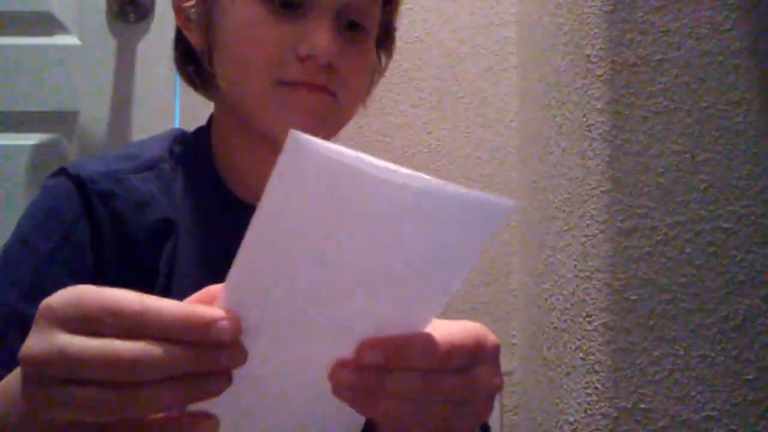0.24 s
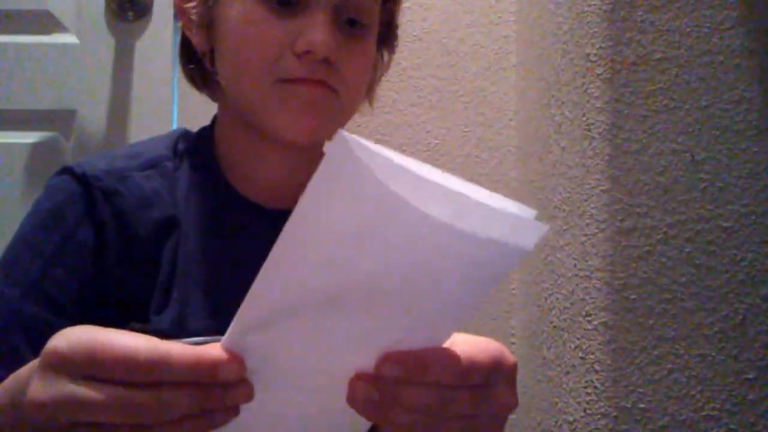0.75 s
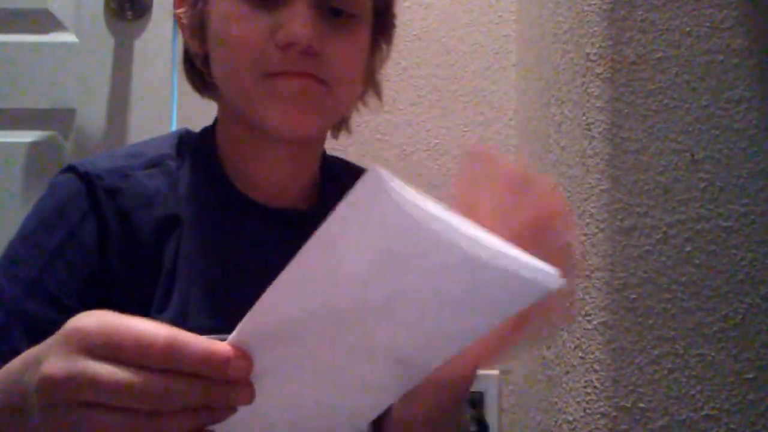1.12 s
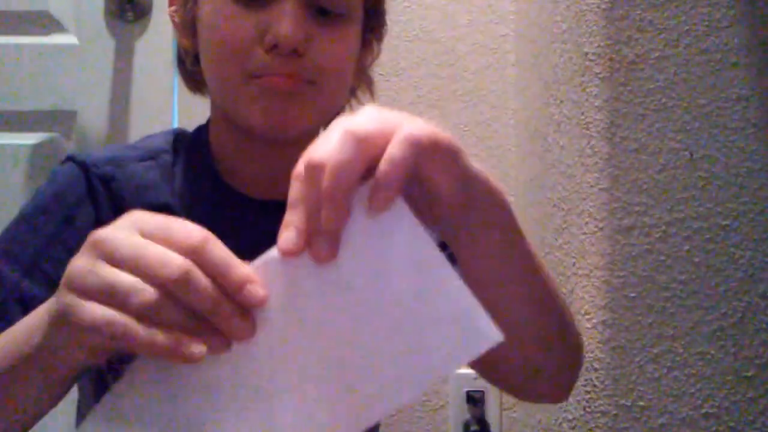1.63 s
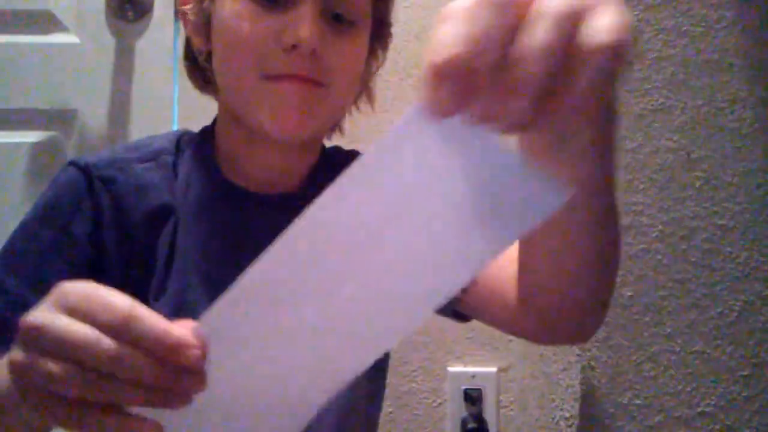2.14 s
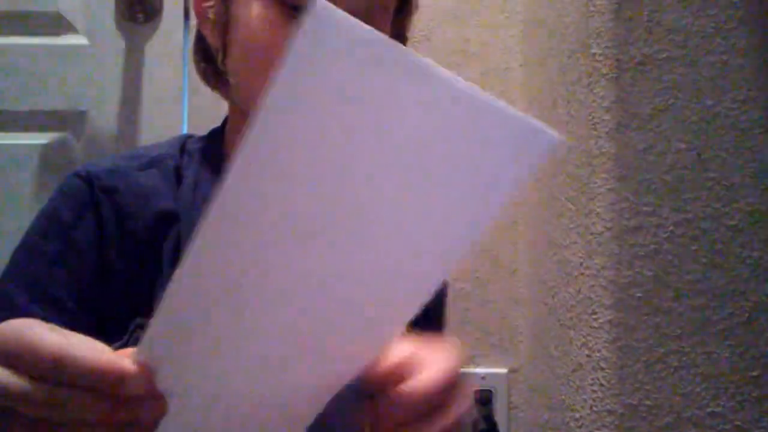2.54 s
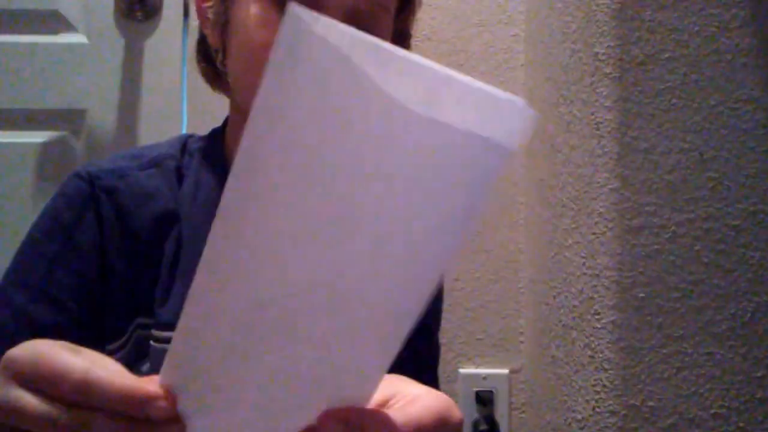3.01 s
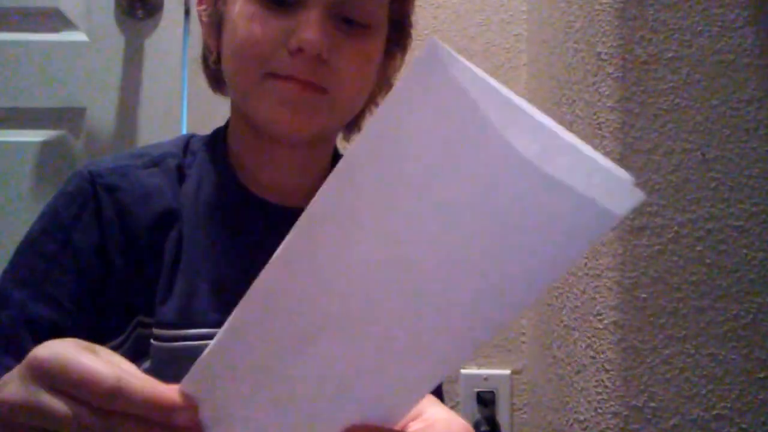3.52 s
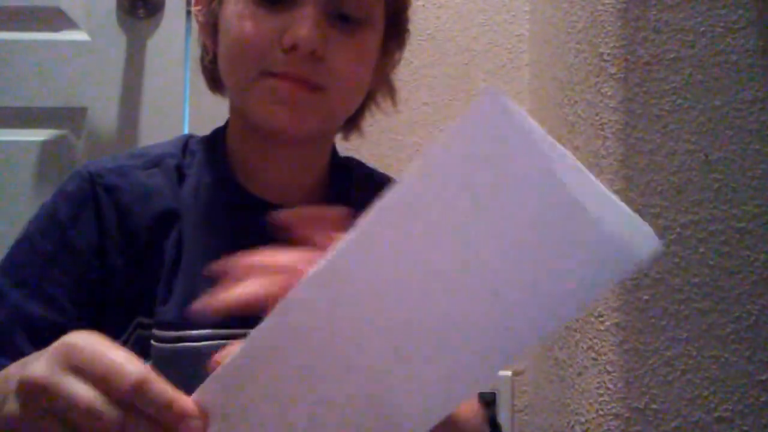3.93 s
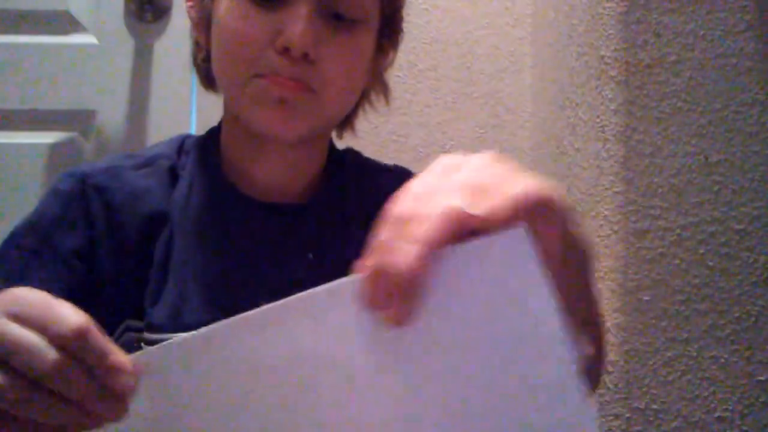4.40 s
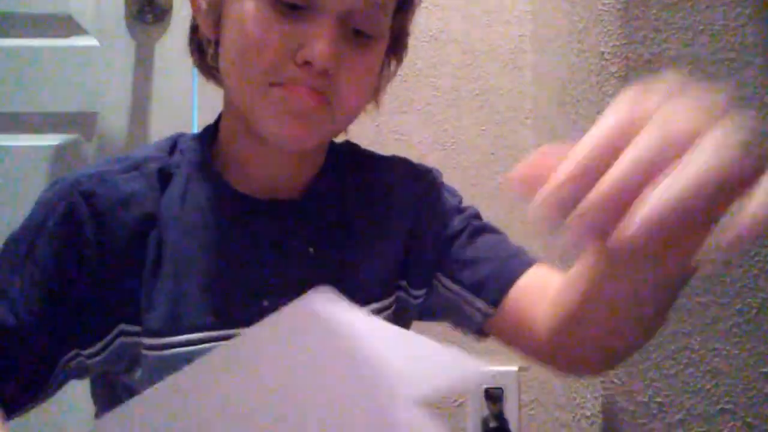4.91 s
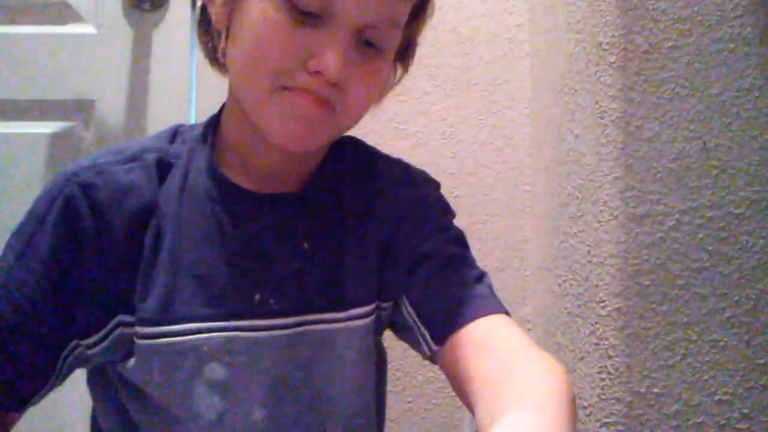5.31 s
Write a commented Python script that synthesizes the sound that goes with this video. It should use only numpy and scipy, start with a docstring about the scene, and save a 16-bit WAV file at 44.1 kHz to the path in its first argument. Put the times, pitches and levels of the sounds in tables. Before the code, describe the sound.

A folded sheet of paper is handled close to a microphone in a small, dead room. From 0.2 to 1.2 s there are loose, dull buckles and pops, one short crisp snap near 0.5 s, and light rustling. A brief rustle comes at 1.5 s, then a hard snap at about 1.76 s and two gritty, hissing finger strokes along the crease until 2.35 s. A quieter gap follows, with small rubs near 2.9 s. Between 3.2 and 3.9 s the sheet flexes in light crackles, ending in a very sharp, bright crack at 3.9 s. From 4.15 to 4.9 s a long, firm creasing rub carries the loudest cluster of cracks, around 4.45-4.6 s. After a near lull, crisp crumply rustling lays the sheet down from 5.2 s to the end. Soft low air thuds accompany the swings, over coloured room noise, faint mains hum and a thin, wavering high whine.

```python
"""A folded sheet of paper is handled close to a microphone in a small, dead room; both channels are alike.
It buckles in snaps, trains of micro-cracks, and some set a panel ringing as a damped note.
Fingers slide along the crease with a gritty hiss of noise grains, while the sheet crinkles and flexes.
Swings of the sheet push low, lumpy air and land as soft thuds made of two low sines.
Below lie coloured room noise, faint mains hum and a thin whine whose level wavers."""
import sys
import numpy as np
from scipy import signal
from scipy.fft import rfft, irfft
from scipy.io import wavfile

SR = 44100
rng = np.random.default_rng(int(sys.argv[2]) if len(sys.argv) > 2 else 0)


def field_ratio(decibels):
    """Amplitude ratio for a level in dB (20 dB per decade); scalars and array-likes work."""
    return 10 ** (np.asarray(decibels, dtype=float) / 20)


def wrap_up_sound(samples):
    """Save the sound to the file named by the first command line argument, as 16-bit audio."""
    columns = np.atleast_2d(samples).T
    # keep every value between -1 and 1, then stretch to whole-number steps
    tamed = np.clip(columns, -1, 1)
    steps = np.round(tamed * 32767).astype(np.int16)
    wavfile.write(sys.argv[1], SR, steps)


N = 244755


def rms_one(x):
    """Scales a signal to rms 1."""
    return x / np.sqrt(np.mean(x ** 2) + 1e-20)


def in_time(rows):
    """Draws each level column as straight lines between its time points."""
    s, *columns = np.transpose(rows)
    return [np.interp(np.arange(N) / SR, s, c) for c in columns]


def band(x, low_hz, high_hz, order=2):
    """Keeps the range between two frequencies."""
    return signal.sosfilt(signal.butter(order, [low_hz, high_hz], "band", fs=SR, output="sos"), x)


def coloured(x, spectrum):
    """Shapes noise to a spectrum drawn over log frequency, rms 1."""
    hz, level_db = np.transpose(spectrum)
    grid = np.maximum(np.fft.rfftfreq(N, 1 / SR), 1)
    gain = field_ratio(np.interp(np.log(grid), np.log(hz), level_db))
    return rms_one(irfft(rfft(x) * gain, N))


def drift(rate_hz):
    """Slow random wander, rms 1: noise smoothed by two equal poles."""
    r = np.exp(-2 * np.pi * rate_hz / SR)
    return rms_one(signal.lfilter([1], [1, -2 * r, r * r], rng.standard_normal(N + SR))[SR:])


def grains(per_s, spread_db, clump_db, clump_rate):
    """Tiny slips of uneven size and random sign, clumped by a slow wander of their level; rms 1."""
    born = rng.random(N) < per_s / SR
    sizes = field_ratio(spread_db * np.minimum(rng.exponential(1, N), 5)) * rng.choice([-1, 1], N)
    return rms_one(born * sizes * field_ratio(clump_db * drift(clump_rate)))


# colour of the room noise: [f/Hz, relative level/dB]
ROOM_NOISE_SPECTRUM = [(18, -42), (45, 0.5), (204, -12), (273, -12.5), (415, -5.5), (512, -12), (1220, -18),
                       (6900, -23.5), (16000, -23.5)]
# wavering whine: [t/s, rms level/dB]
WHINE_LEVEL = [(0.0, -70), (0.5, -62), (0.9, -76), (1.2, -78), (1.6, -71), (2.4, -67.5), (2.7, -74),
               (2.9, -62), (3.4, -69), (3.8, -66), (4.9, -68.5), (5.55, -75)]


def background():
    """Room noise with a slight flicker, plus two steady-pitched sines: faint mains hum and the whine."""
    noise = coloured(rng.standard_normal(N), ROOM_NOISE_SPECTRUM)
    noise = noise * field_ratio(-61.5 + 1.5 * drift(5))
    turn_per_hz = 2 * np.pi * np.arange(N) / SR
    hum = field_ratio(-73) * np.sin(60 * turn_per_hz)
    whine_db, = in_time(WHINE_LEVEL)
    whine = np.sqrt(2) * field_ratio(whine_db) * np.sin(8000.5 * turn_per_hz)  # root 2 turns rms into peak
    return noise + hum + whine


# swings of the sheet, also heard as thuds: [t/s of the peak, level/dB, t/s to fall 20 dB (at least 0.01)]
SHEET_SWINGS = [(0.219, -44, 0.3), (0.49, -52.5, 0.6), (0.758, -47.5, 0.18), (1.198, -50, 0.15),
                (1.549, -49.5, 0.4), (1.758, -46, 0.5), (1.969, -55, 1), (2.171, -47, 0.44),
                (2.802, -54, 0.3), (3.199, -52, 0.2), (3.532, -49, 1.5), (4.173, -47.5, 0.4),
                (4.501, -44, 0.46), (4.63, -54, -0.13), (4.889, -53, 0.7), (5.271, -46, 0.3),
                (5.501, -49.5, -3)]


def air_push():
    """Swings of the sheet push lumpy low air at the microphone, strongest in a narrow hollow band."""
    rise_db_per_s, still_air_db = 343.5, -76
    t, push_db = np.arange(N) / SR, np.full(N, float(still_air_db))
    for s, peak_db, fall_s in SHEET_SWINGS:
        slope = np.where(t < s, rise_db_per_s, 20 / max(fall_s, .01))
        push_db = np.maximum(push_db, peak_db - slope * np.abs(t - s))
    air = rng.standard_normal(N)
    low_air = band(air, 54, 250) + field_ratio(3.5) * band(air, 48, 78)
    lumps = field_ratio(3.8 * drift(17))
    return field_ratio(push_db) * rms_one(low_air * lumps)


# buckling snaps, also the start of each settling:
# [t/s, body level/dB, middle level/dB, edge level/dB, dying time constant/ms]
BUCKLES = [(0.171, -30.5, -62, -73, 5.7), (0.206, -16, -16, -31, 5.9), (0.287, -28.5, -46, -50, 5.7),
           (0.378, -45, -34.5, -45, 1.2), (0.395, -41.5, -38, -33, 4), (0.437, -38, -54, -33.5, 1.5),
           (0.498, -16.5, -13.5, -34.5, 1.05), (0.589, -27.5, -34, -51, 7), (0.634, -39, -29.5, -26.5, 2.2),
           (0.747, -22, -28.5, -39.5, 8.1), (0.806, -24.5, -33.5, -50.5, 7.9),
           (0.855, -29.5, -47, -63, 3.3), (0.996, -38, -67, -78, 1.7), (1.126, -35, -55, -36, 0.7),
           (1.141, -25, -37, -47, 5.1), (1.19, -23.5, -22, -23.5, 1.1), (1.21, -18, -22.5, -43, 1.3),
           (1.455, -57, -33.5, -28.5, 5.4), (1.619, -22, -42, -43, 1.3), (1.624, -27, -16.5, -26.5, 2.5),
           (1.645, -35, -21.5, -42, 2), (1.762, -10, -1.5, -11.5, 2.7), (1.852, -19, -21.5, -35, 4.4),
           (1.972, -27.5, -52, -42, 2.4), (2.042, -35, -56, -33, 1.3), (2.081, -27, -27.5, -28, 1.8),
           (2.16, -13, -15, -21, 3.3), (2.171, -16.5, -43, -22, 0.91), (2.24, -22.5, -33.5, -42, 6.6),
           (2.267, -48, -29, -51, 2.1), (2.403, -26, -25, -27, 5.4), (2.75, -38, -51, -48, 3.7),
           (2.785, -25.5, -29.5, -52.5, 3.7), (2.925, -30.5, -35, -53, 2.5), (3.185, -21, -18.5, -26, 5.7),
           (3.296, -18, -20.5, -32.5, 1.25), (3.355, -57, -40, -42, 2.3), (3.501, -32.5, -25.5, -23.5, 5.4),
           (3.584, -23, -25.5, -39, 5.4), (3.608, -27.5, -39, -49.5, 1.3), (3.638, -31, -40, -55, 2.5),
           (3.647, -28, -37, -62, 3.1), (3.665, -39, -36, -29.5, 1.4), (3.672, -26, -30, -46, 4.1),
           (3.741, -22, -13, -27.5, 0.87), (3.85, -28.5, -38, -45, 1.3), (3.887, -23.5, -19, -34.5, 0.67),
           (3.899, -25.5, -28, -42, 1.5), (3.9115, -11, -9, -5.5, 2), (4.169, -21, -33, -38, 5),
           (4.253, -19.5, -15.5, -26, 2.6), (4.444, -17.5, -2.5, -9.5, 1.43), (4.475, -24, -26, -28, 1.3),
           (4.492, -21.5, -10.5, -18, 15), (4.515, -8.5, -1.5, -6.5, 5.8), (4.551, -17, -3.5, -8, 4.6),
           (4.6199, -40, -1.5, -8.5, 1.3), (4.849, -29, -24, -26, 2.8), (5.008, -32, -40, -50.5, 3),
           (5.076, -36, -41, -61.5, 5.4), (5.222, -25.5, -14, -19.5, 7.1), (5.247, -27, -10, -13, 8.4),
           (5.323, -21.5, -16, -30.5, 9.3), (5.363, -24.5, -15.5, -28, 3.9), (5.402, -34, -25.5, -42, 3.3),
           (5.447, -21, -6, -4, 1.9), (5.461, -24.5, -13, -27, 11.4), (5.486, -22, -12.5, -11.5, 5.3)]


def snaps():
    """Each buckle is a quick train of micro-cracks that swells and dies, mixed from three bands."""
    panel_lift, panel_sharpness = 0.8, 4  # gain and Q of the bent sheet's resonances
    size = int(.07 * SR)
    t, out = np.arange(size) / SR, np.zeros(N + size)
    blunting = signal.butter(2, 7960, fs=SR, output="sos")  # softens body and middle
    for s, body_db, middle_db, edge_db, die_ms in BUCKLES:
        cracks = rng.standard_normal(size) * field_ratio(5.7 * rng.exponential(1, size))
        swell, die = (0.73 + 0.19 * die_ms) / 1000, die_ms / 1000  # s; slow snaps swell longer
        burst = cracks * np.where(t < swell, (t / swell) ** 2, np.exp(-(t - swell) / die))
        # every buckle favours three chance pitches
        for pitch_hz in 500 * 2 ** rng.uniform(0, 4, size=3):
            peak = signal.iirpeak(pitch_hz, panel_sharpness, fs=SR)
            burst = burst + panel_lift * signal.lfilter(*peak, burst)
        crispness_db = edge_db - middle_db
        reach_hz = np.interp(crispness_db, [-24, -6], [2800, 5200])  # a dull buckle's middle stops lower
        top_hz = np.interp(crispness_db, [-4, 6], [8500, 10500])  # a crisp one's edge reaches higher
        blunt = signal.sosfilt(blunting, burst)
        body = band(blunt, 340, 2420, order=3)
        middle = band(blunt, 1498, reach_hz, order=3)
        edge = band(band(burst, 5670, top_hz), 5400, top_hz + 500)
        at = round(s * SR)
        for peak_db, part in ((body_db, body), (middle_db, middle), (edge_db, edge)):
            crest = np.sqrt(2.5 * np.sum(part ** 4) / np.sum(part ** 2))  # typical height of the loud part
            out[at:at + size] += field_ratio(peak_db) * part / crest
    return out[:N]


# short shifts of the grip: [start t/s, length t/s, rub level/dB, crinkle level/dB, flex level/dB]
GRIP_SHIFTS = [(0.179, 0.13, -61.5, -53.5, -55), (0.352, 0.037, -51, -54, -70),
               (0.426, 0.0075, -58, -52, -69), (0.54, 0.068, -40, -44, -62), (0.759, 0.11, -68, -63, -51),
               (1.09, 0.03, -53, -63, -82), (1.13, 0.093, -48, -61.5, -53),
               (1.455, 0.064, -52, -60.5, -58.5), (1.532, 0.04, -35, -37.5, -39.5),
               (1.617, 0.06, -50, -53, -41.5), (1.71, 0.04, -50, -53, -47), (2.385, 0.044, -53.5, -57, -64),
               (2.552, 0.17, -85, -80, -64.5), (2.781, 0.025, -50.5, -54, -41.5),
               (2.855, 0.05, -50, -55, -51.5), (2.873, 0.074, -39.5, -48, -56),
               (3.002, 0.12, -53.5, -64.5, -82), (3.157, 0.026, -36.5, -42, -52),
               (3.449, 0.019, -62.5, -68, -49.5), (3.487, 0.026, -49, -64, -53.5),
               (3.537, 0.091, -50.5, -64, -49), (3.646, 0.024, -55, -51, -49.5),
               (3.846, 0.072, -46.5, -55, -57), (4.897, 0.081, -64, -75, -47.5),
               (5.003, 0.042, -67, -72, -55), (5.104, 0.029, -90, -80.5, -54)]
# long strokes, three along the crease and one laying the sheet down, each a list of points:
# [t/s, rub level/dB, crinkle level/dB, flex level/dB]
LONG_STROKES = [
    [(1.79, -57, -60, -41), (1.813, -47, -53, -49.5), (1.905, -34.5, -44, -59.5), (1.982, -42, -46, -40.5),
     (2.0, -60, -73, -63)],
    [(2.0, -61, -58, -66), (2.07, -53, -54.5, -58), (2.1, -38.5, -52.5, -71), (2.174, -35, -37.5, -41),
     (2.218, -39.5, -50, -42), (2.338, -41.5, -51.5, -64.5), (2.36, -67, -72, -58)],
    [(4.152, -73, -86, -71.5), (4.157, -38.5, -41, -34), (4.174, -52, -30.5, -43.5),
     (4.207, -44.5, -49.5, -45), (4.355, -32, -38, -56.5), (4.423, -36, -42.5, -49.5),
     (4.521, -32, -41, -47.5), (4.632, -36.5, -45, -34), (4.69, -37.5, -57, -60), (4.72, -46.5, -54, -70),
     (4.75, -39.5, -53, -88), (4.836, -39.5, -53.5, -63), (4.856, -44, -48, -41.5), (4.9, -90, -67, -46.5)],
    [(5.217, -82, -42, -48), (5.225, -27.5, -27, -38.5), (5.243, -37, -25, -35), (5.297, -38.5, -37.5, -44),
     (5.409, -41.5, -53.5, -61), (5.443, -41, -45, -54), (5.491, -42, -32, -42), (5.548, -64, -78, -75)],
]


def hand_levels():
    """Gains of rub, crinkle and flex: grips, strokes and the settling after snaps add up as power."""
    t, power = np.arange(N) / SR, np.zeros((3, N))
    for s, length, *levels_db in GRIP_SHIFTS:
        rise_loss_db = 2597 * np.maximum(s - t, 0)  # slopes in dB per s
        fall_loss_db = 496 * np.maximum(t - s - length, 0)
        power += np.outer(field_ratio(levels_db), field_ratio(-rise_loss_db - fall_loss_db)) ** 2
    for stroke in LONG_STROKES:
        active = (t >= stroke[0][0]) & (t < stroke[-1][0])
        power += field_ratio(in_time(stroke)) ** 2 * active
    s, body_db, middle_db, edge_db, _ = np.transpose(BUCKLES)
    # settling: rub follows the edge, crinkle the middle, flex the body (start re snap in dB, fade in dB per s)
    settling = ((edge_db, -16, 506), (middle_db, -21.5, 495.5), (body_db, -24, 292.5))
    for k, (snap_db, start_db, fade_db_per_s) in enumerate(settling):
        kicks = np.full(N, 1e-18)
        kicks[(s * SR).astype(int)] = field_ratio(snap_db + start_db) ** 2
        power[k] += signal.lfilter([1], [1, -field_ratio(-2 * fade_db_per_s / SR)], kicks)
    return np.sqrt(power)


def pocket(x):
    """The air pocket between the two leaves returns a short echo, so the hiss gets slowly moving bands."""
    delay_ms = np.maximum(0.452 + 0.14 * drift(0.94), .05)
    lag = delay_ms * SR / 1000
    return x + 0.32 * np.interp(np.arange(N) - lag, np.arange(N), x)


# colour of the finger rub before pocket and sheen: [f/Hz, relative level/dB]
RUB_SPECTRUM = [(2600, -33), (4200, -4.5), (5200, 0.5), (6800, -1.5), (9500, -11.5), (11500, -24.5),
                (16000, -25.5)]
# top treble added to the rub: [t/s, level/dB]
RUB_SHEEN = [(0, 16.5), (.6, -9), (1.5, -0.5), (1.9, -6), (2.2, -1), (2.9, -13), (3.9, -4.5), (4.3, -1),
             (4.85, -1.5), (5.2, 1.5), (5.55, -22)]


def hands():
    """Skin slides on the fibres with a fine even hiss; below it the sheet crinkles and flexes dully."""
    rub_gain, crinkle_gain, flex_gain = hand_levels()
    sheen_db, = in_time(RUB_SHEEN)
    rub = coloured(grains(30000, spread_db=-2.5, clump_db=2.0, clump_rate=16), RUB_SPECTRUM)
    rub = pocket(rub)
    treble = band(rub, 7400, 9300) + field_ratio(4.5) * band(rub, 7810, 13000)
    rub = rub + field_ratio(sheen_db) * treble
    crinkle = rms_one(band(grains(6000, spread_db=1.5, clump_db=0.0, clump_rate=26), 1490, 3980))
    flex = rms_one(band(grains(3000, spread_db=2.0, clump_db=2.55, clump_rate=23), 180, 1230))
    # lone ticks of fibres giving way
    ticks = grains(450, spread_db=2.2, clump_db=3.0, clump_rate=18)
    crinkle = crinkle + 1.34318 * band(ticks, 970, 4500, order=4)
    flex = flex + 1.40332 * band(ticks, 310, 1400, order=3)
    return rub_gain * rub + crinkle_gain * crinkle + flex_gain * flex


def thuds():
    """Each swing also lands as a few cycles of a hollow, low pair of notes that swells and dies."""
    lead_s, die_s = 0.028, 0.015  # start ahead of the swing's peak; time to swell, then die
    t, out = np.arange(int(.3 * SR)) / SR, np.zeros(N + SR)
    for (s, peak_db, _), spread in zip(SHEET_SWINGS, rng.uniform(-0.37, 1, len(SHEET_SWINGS))):
        pitch_hz = 65.7 * (1 + 0.12 * spread)
        turn = 2 * np.pi * pitch_hz * t
        pair = np.sin(turn) + 0.76 * np.sin(1.4 * turn)
        shape = t / die_s * np.exp(1 - t / die_s)
        at = round((s - lead_s) * SR)
        out[at:at + len(t)] += field_ratio(peak_db + 3) * pair * shape
    return out[:N]


# panels set ringing by a buckle: [t/s, f/Hz, level/dB, dying time constant/ms (at least 0.3)]
PANEL_RINGS = [(0.206, 1170, -26, 4.1), (0.267, 1130, -30, 1.4), (0.28, 475, -32, 2.9),
               (0.499, 1240, -20, 1.8), (0.809, 1200, -33, 4.8), (1.213, 1220, -34, 4.9),
               (2.171, 1305, -21.5, 1.9), (3.297, 1205, -27.5, 3.6), (3.408, 418, -45, 7.6),
               (3.448, 455, -39, 2.9), (3.671, 1170, -32, 3), (3.9113, 8400, -3, 0.27),
               (3.9121, 2270, -9.5, 0.34), (4.445, 3450, -14, 1.6), (4.553, 4300, -7.5, 1.4),
               (4.621, 670, -16, 1), (5.012, 510, -36.5, 3.8), (5.449, 3610, -10, 3.7)]


def rings():
    """Each ring is one damped note of a sheet panel."""
    swell_ms = 0.3
    t, out = np.arange(int(.07 * SR)) / SR, np.zeros(N + SR)
    for s, pitch_hz, peak_db, die_ms in PANEL_RINGS:
        swell = 1 - np.exp(-1000 * t / swell_ms)
        shape = swell * np.exp(-1000 * t / max(die_ms, .3))
        at = round(s * SR)
        out[at:at + len(t)] += field_ratio(peak_db) * shape / shape.max() * np.sin(2 * np.pi * pitch_hz * t)
    return out[:N]


# decay of the room: [f/Hz, t/s to fall 60 dB]
ROOM_DECAY = [(200, 0.16), (700, 0.044), (1800, 0.03), (5000, 0.069), (12000, 0.15)]


def room(x, first_ms, echo_db, tail_db):
    """One echo off the near wall and a dense tail whose wide, overlapping bands die at their own rates."""
    size = int(.3 * SR)
    t, tail = np.arange(size) / SR, np.zeros(size)
    for hz, t60 in ROOM_DECAY:
        tail += band(rng.standard_normal(size), hz / 5.5, hz * 1.81) * field_ratio(-60 * t / t60)
    tail *= t > first_ms / 2000  # the tail starts at half the echo's delay
    response = field_ratio(tail_db) * tail / np.sqrt(np.sum(tail ** 2))
    response[0] = 1  # direct sound
    response[int(first_ms * SR / 1000)] += field_ratio(echo_db)
    return signal.fftconvolve(x, response)[:N]


# resonances of the microphone housing: [f/Hz, width f/Hz, boost or cut level/dB]
HOUSING_BANDS = [(292, 42, -7.5), (421.6, 55, 6), (631, 5.6, 2.5), (1088, 83, 2.5), (9450, 12700, -2.5)]


def housing(x):
    """The microphone housing boosts some bands and cuts others, each through a resonator in turn."""
    for hz, width_hz, lift_db in HOUSING_BANDS:
        resonance = signal.lfilter(*signal.iirpeak(hz, hz / width_hz, fs=SR), x)
        x = x + (field_ratio(lift_db) - 1) * resonance
    return x


def scene():
    """Snaps, rings and hands sound in the room; air and thuds hit the microphone directly."""
    buckling = band(snaps() + rings(), 110, 10800, order=4)
    paper = room(buckling + hands(), first_ms=4.8, echo_db=-16.5, tail_db=-15.0)
    close = housing(paper + air_push() + thuds())
    return np.tile(close + background(), (2, 1))


def low_pass(x):
    """Removes everything above the highest recorded frequency."""
    return signal.sosfilt(signal.butter(12, 17010, fs=SR, output="sos"), x)


def record(dry):
    """The microphone loses the deepest bass, rounds high peaks, loses the top and sits slightly off zero."""
    heard = signal.sosfilt(signal.butter(3, 42, "high", fs=SR, output="sos"), dry)
    overload = 1.5  # height at which the input stage flattens out
    heard = overload * np.tanh(heard / overload)
    heard = signal.sosfilt(signal.cheby2(12, 60, 16600, fs=SR, output="sos"), heard)
    heard = heard - .0005
    return low_pass(heard)


dry = scene()
out = record(dry)
wrap_up_sound(out)
```